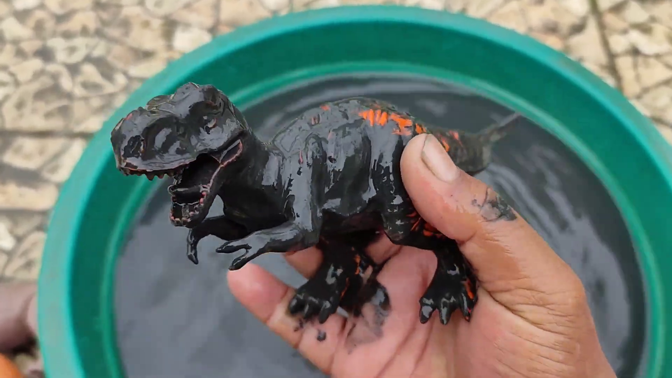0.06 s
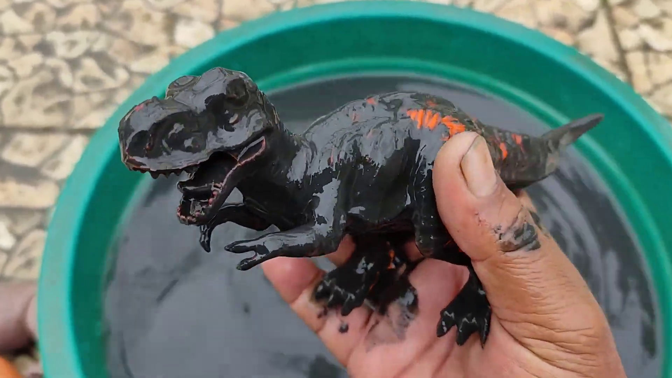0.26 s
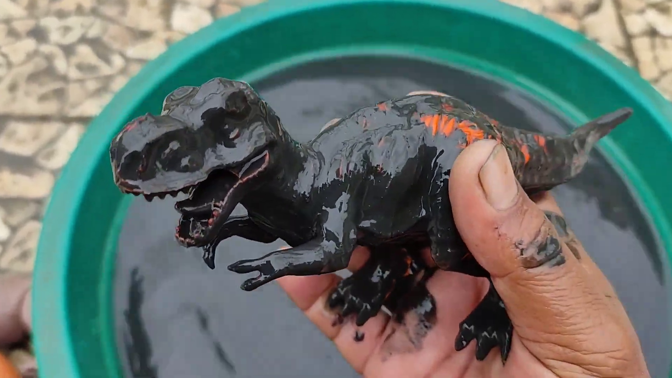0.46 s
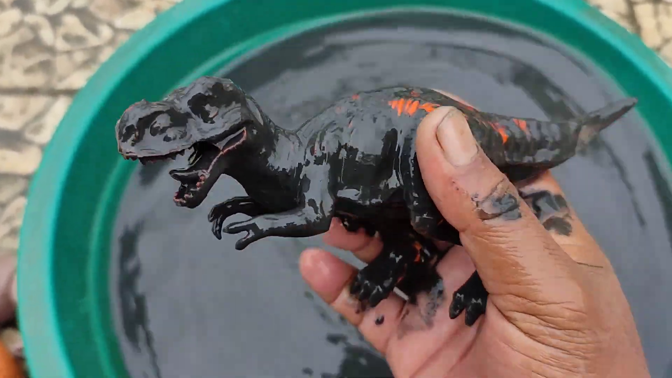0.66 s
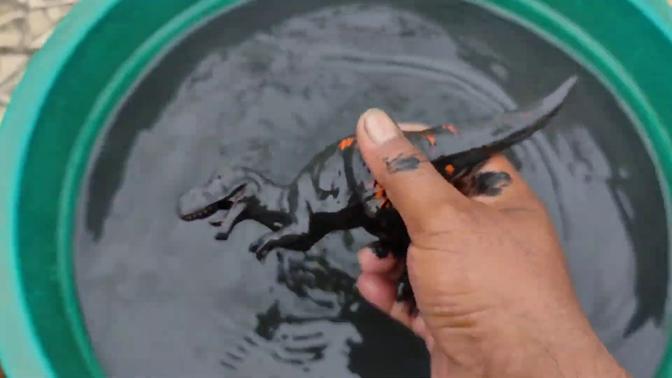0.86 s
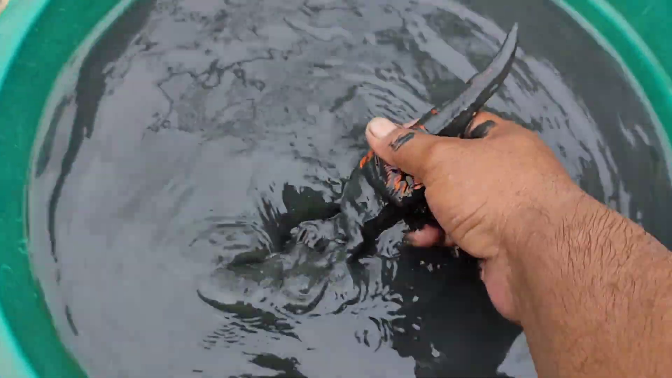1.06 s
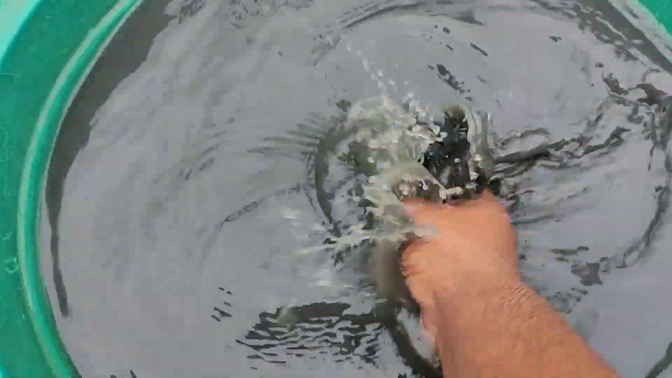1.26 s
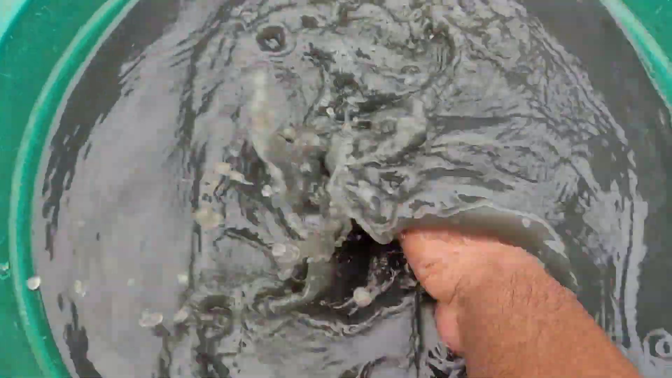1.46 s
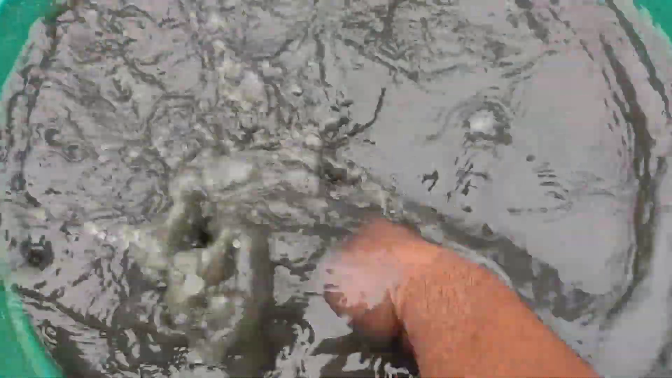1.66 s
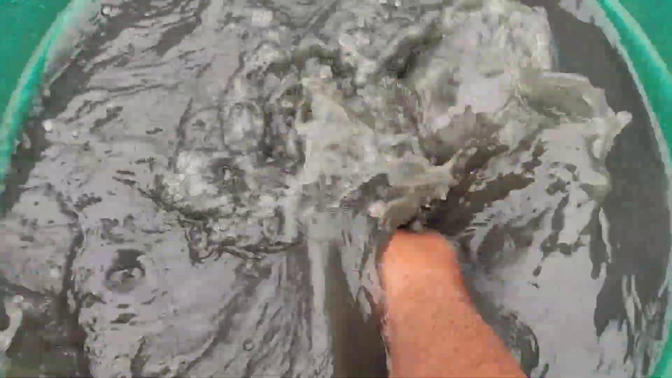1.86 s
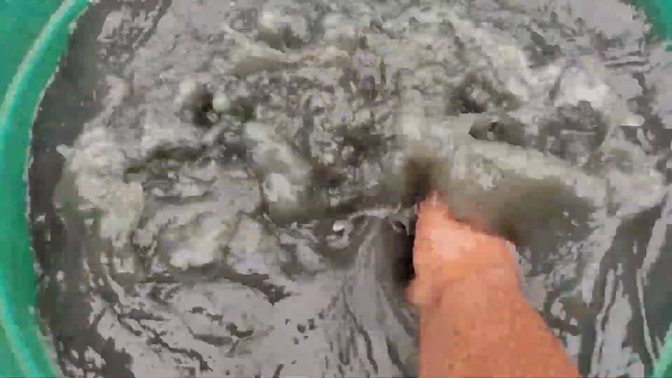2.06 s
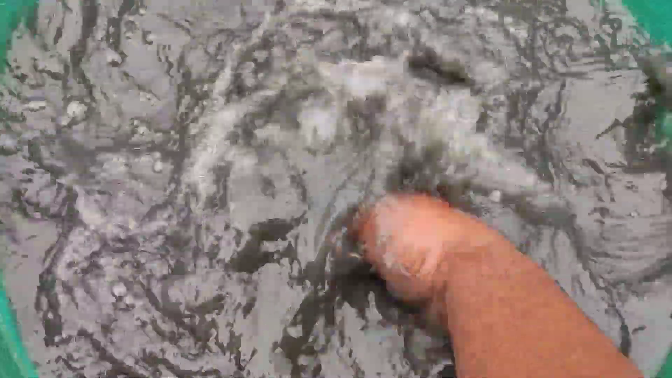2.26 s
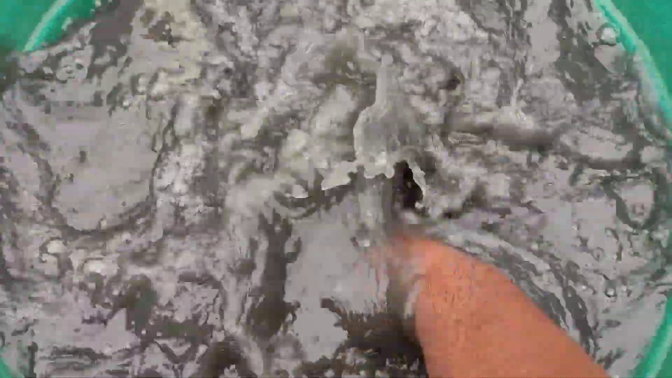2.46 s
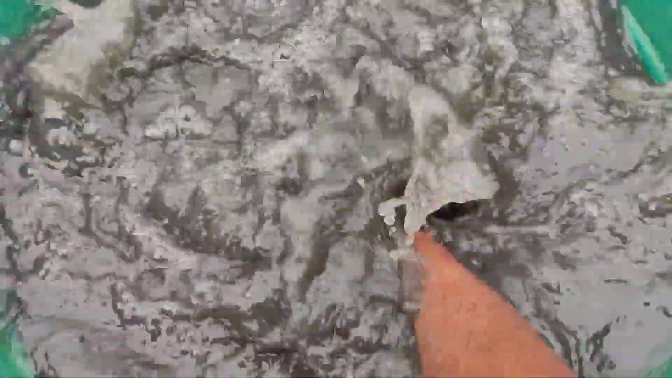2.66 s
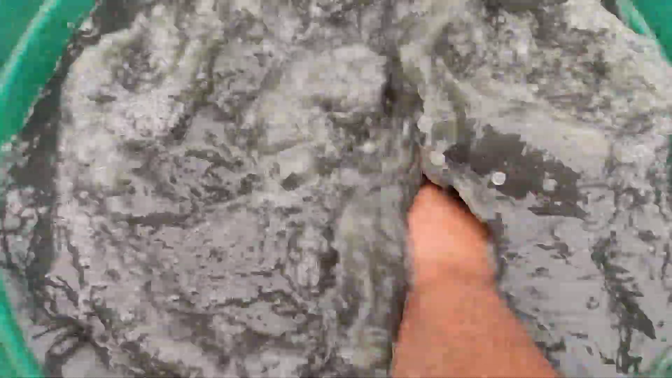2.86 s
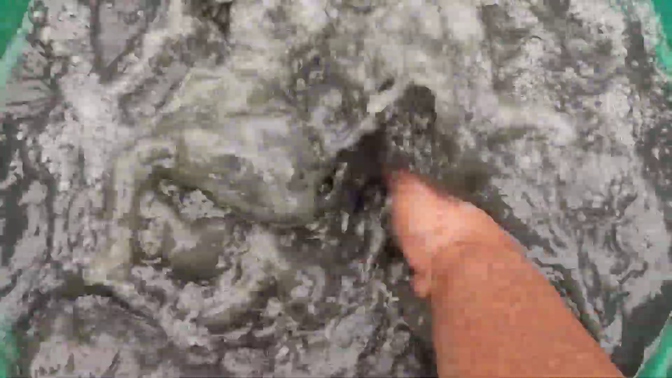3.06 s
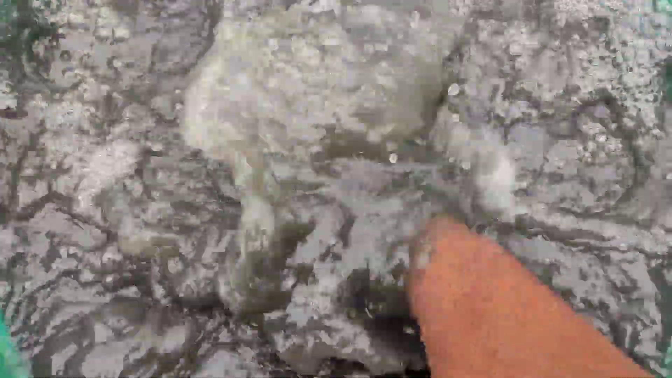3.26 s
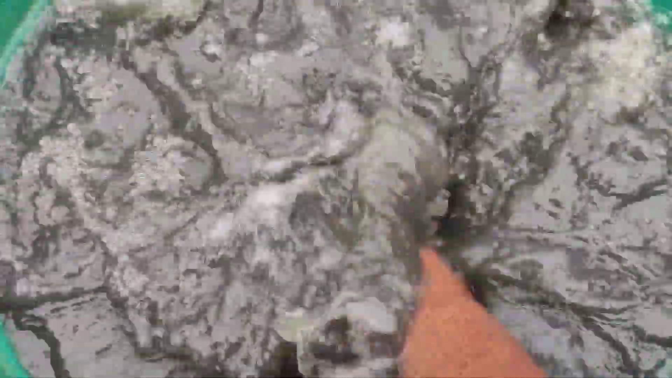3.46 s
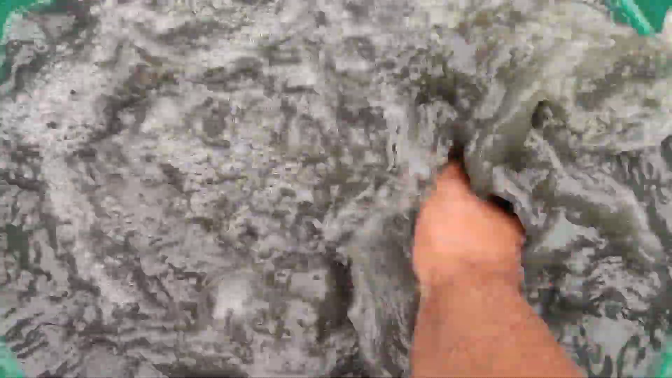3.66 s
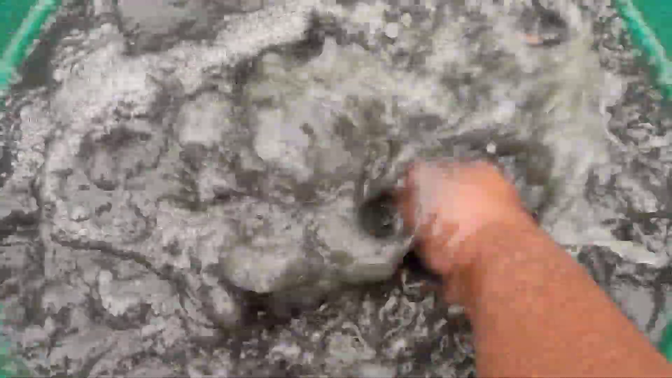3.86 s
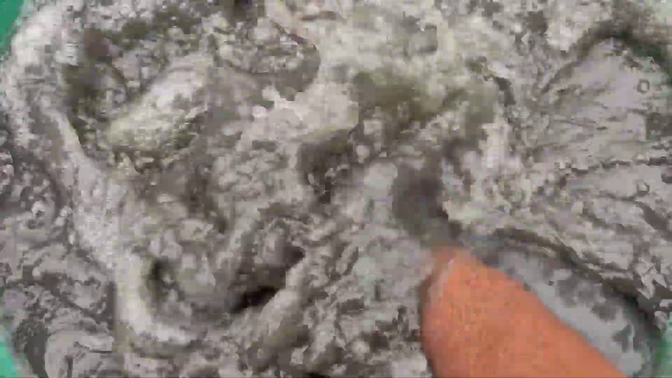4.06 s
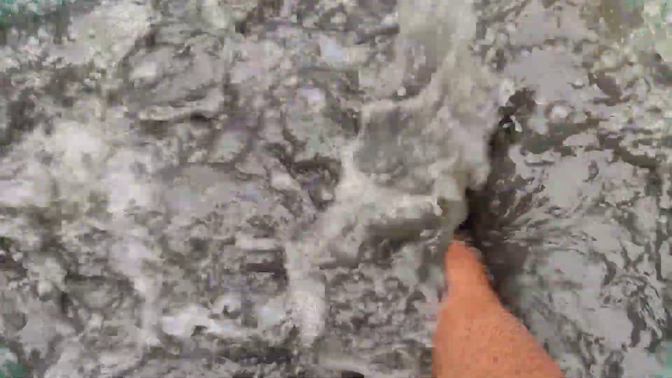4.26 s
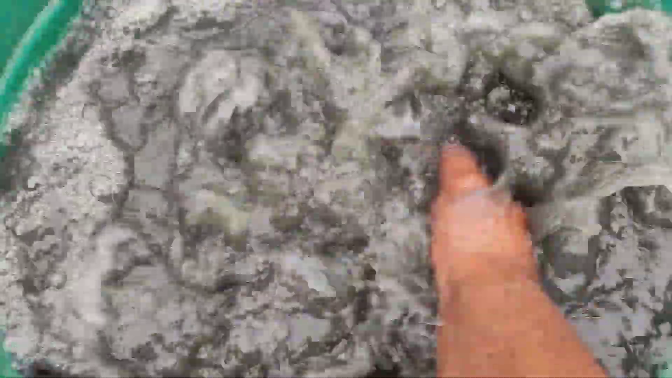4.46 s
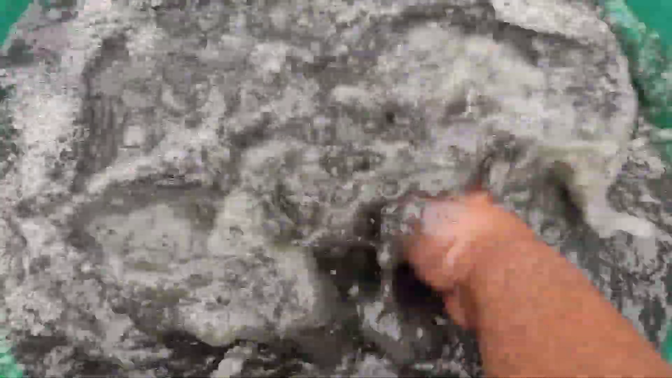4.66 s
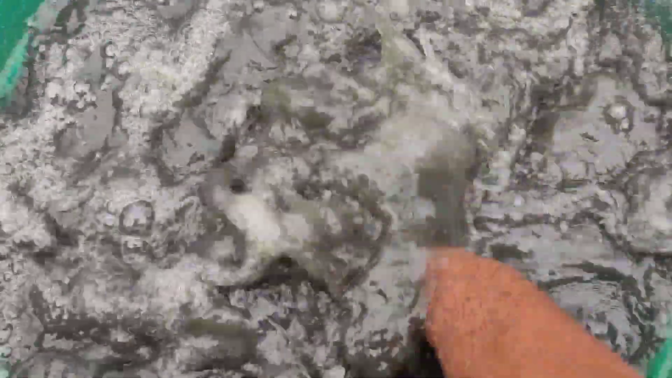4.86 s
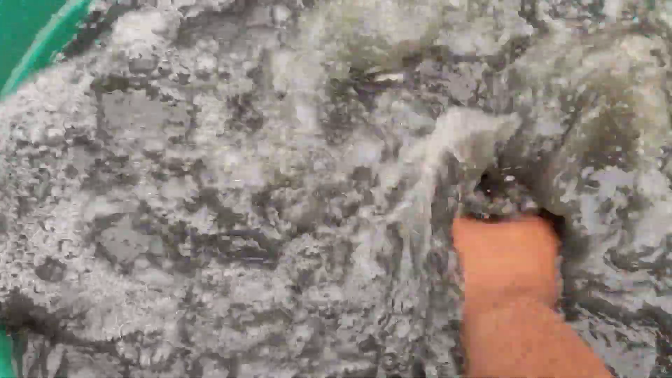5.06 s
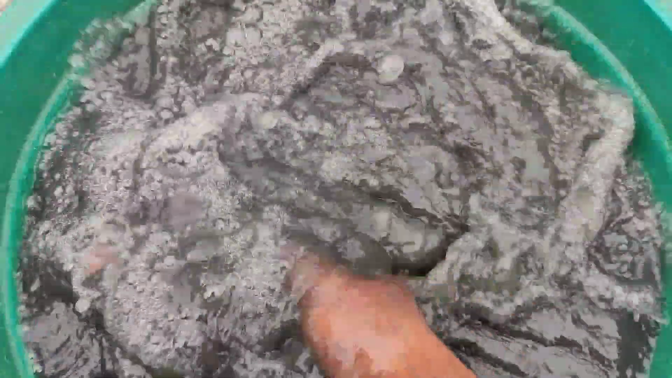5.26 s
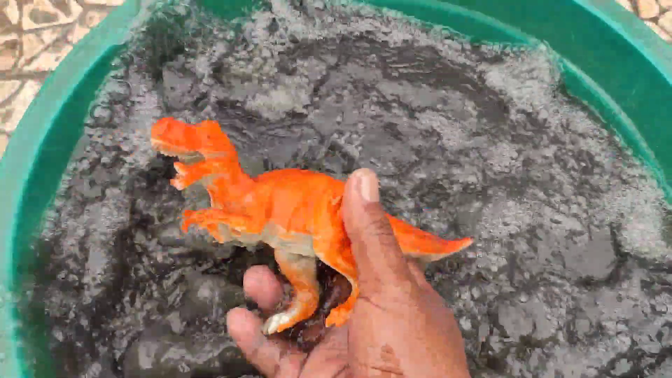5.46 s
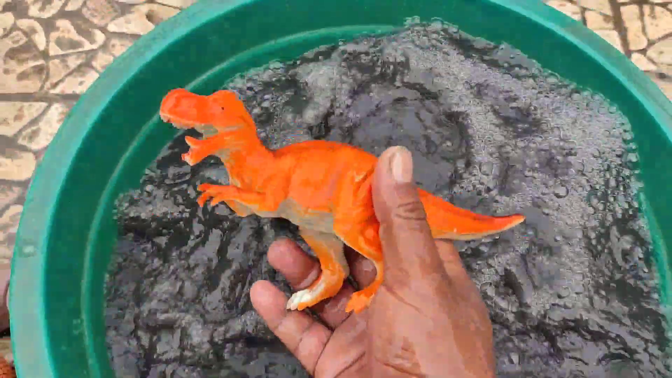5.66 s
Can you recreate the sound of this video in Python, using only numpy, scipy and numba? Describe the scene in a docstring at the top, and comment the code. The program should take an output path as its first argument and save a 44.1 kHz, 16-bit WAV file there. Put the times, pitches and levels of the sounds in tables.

```python
"""Swishing a toy in soapy water

A hand dips a plastic toy into a basin of soapy, muddy water, swishes it hard for four seconds and lifts it out.
Trapped air rings as rising sine tones, from deep gulps to fine spray; slaps are short, tuned noise bursts.
The wet toy's rubbing is uneven noise, and a low rumble and a faint hiss of filtered noise lie under it all."""
import sys
import numpy as np
from scipy import signal
from scipy.fft import rfft, irfft, next_fast_len
from scipy.io import wavfile
from scipy.ndimage import uniform_filter1d
from numba import njit

SR = 44100
rng = np.random.default_rng(int(sys.argv[2]) if len(sys.argv) > 2 else 0)


def transcribe(signal):
    """Save signal, clipped to [-1, 1], as a 16-bit WAV file at the path in sys.argv[1]."""
    frames = np.atleast_2d(signal).T
    limited = np.clip(frames, -1, 1)
    pcm = np.round(limited * 32767).astype(np.int16)
    wavfile.write(sys.argv[1], SR, pcm)


N = 252516
TIME = np.arange(N) / SR
LEFT_LAG_S = 0.00011  # the left side hears the water slightly later


def from_db(db):
    """Turn decibels into gain."""
    return 10 ** (np.asarray(db) / 20)


def rms_one(x):
    """Scale to an rms (average strength) of 1."""
    return x / np.sqrt(np.mean(x ** 2) + 1e-20)


def in_time(rows):
    """Turn each dB column of a time curve into a gain per sample."""
    s, *columns = np.transpose(rows)
    return [from_db(np.interp(TIME, s, column)) for column in columns]


def at_hz(points, hz):
    """Read the gain of a spectrum at these frequencies."""
    known_hz, db = np.transpose(points)
    return from_db(np.interp(np.log(np.maximum(hz, 1)), np.log(known_hz), db))


def colour(x, spectrum):
    """Filter by a spectrum that falls away steeply past both ends."""
    size = next_fast_len(x.shape[-1] + 2000)
    hz = np.fft.rfftfreq(size, 1 / SR) + 1
    lowest_hz, highest_hz = spectrum[0][0], spectrum[-1][0]
    skirts = np.minimum(1, np.minimum(hz / lowest_hz, highest_hz / hz)) ** 4
    return irfft(rfft(x, size) * at_hz(spectrum, hz) * skirts, size)[..., :x.shape[-1]]


def add(out, s, sound):
    """Mix a stereo sound in at time s."""
    i = int(np.clip(round(s * SR), 0, N - 1))
    out[:, i:i + sound.shape[-1]] += sound[:, :N - i]


def panned(left_db):
    """Give the gains of two channels that differ by this many dB."""
    return from_db(np.array([[.5], [-.5]]) * left_db)


def delayed(x, s):
    """Make one channel later by s."""
    return np.interp(TIME - s, TIME, x, left=0)


def evened(x, span_s):
    """Hold the running level near 1 and keep the faster grain."""
    size = max(int(span_s * SR), 8)
    power = uniform_filter1d(uniform_filter1d(np.mean(x ** 2, axis=0), size), size)
    floor = 0.11 * np.mean(power)  # keeps quiet gaps from being blown up
    return x / np.sqrt(np.maximum(power, 0) + floor)


def resonance(x, hz, q):
    """Ring like a damped resonance with gain 1 at its top."""
    hz = np.clip(hz, 100, .4 * SR)
    return signal.lfilter(*signal.iirpeak(hz, max(q, 1), fs=SR), x + 1e-18)


@njit
def ring_bubbles(rows, size, rate):
    """Each pocket of air rings as a fading sine and rises in pitch as it nears the surface."""
    # columns: start_s, pitch_hz, gain, t60_s (time to fade by 60 dB), rise, left_lag_s, left_gain
    out = np.zeros((2, size))
    for s, hz, gain, t60, rise, lag_s, left in rows:
        for channel in range(2):
            born = s + lag_s * (1 - channel)
            height = gain * (left if channel == 0 else 1 / left)
            for i in range(max(int(born * rate) + 1, 0), min(int((born + t60) * rate), size)):
                t = i / rate - born
                swell = (1 - np.exp(-1.5 * hz * t)) * np.exp(-np.log(1000) * t / t60)
                out[channel, i] += height * swell * np.sin(2 * np.pi * hz * t * (1 + .5 * rise * t / t60))
    return out


def bubble_cloud(sizes, count, cycles, rise, spread_db, scatter_s, pan_db, even_s):
    """Bubbles are born at random all over the basin and ring for some cycles; running level near 1."""
    when, size = rng.random((2, count))
    loud, life, climb, place, side = rng.normal(size=(5, count))
    lowest_hz, highest_hz = sizes[0][0], sizes[-1][0]
    hz = lowest_hz * (highest_hz / lowest_hz) ** size
    gain = at_hz(sizes, hz) * from_db(spread_db * loud)
    t60 = max(cycles, 2) / hz * 2 ** (.5 * life)
    lag_s = LEFT_LAG_S + scatter_s * place
    rows = [when * N / SR, hz, gain, t60, rise * (1 + climb), lag_s, from_db(.5 * pan_db * side)]
    return evened(ring_bubbles(np.column_stack(rows), N, SR), even_s)


def spatter(t60, tail_db, tail_t60, attack_s, direct_db):
    """An impact is a crack and a brief fizz, partly shared by both sides; energy 1 on each side."""
    t = np.arange(1600) / SR
    crack, fizz = from_db(-60 * t / t60), from_db(tail_db - 60 * t / tail_t60)
    shape = (crack + fizz) * (1 - np.exp(-t / attack_s))
    direct, *scattered = rng.standard_normal((3, len(t)))
    both_sides = np.array([np.roll(direct, round(LEFT_LAG_S * SR)), direct])
    burst = shape * (scattered + from_db(direct_db) * both_sides)
    return burst / np.sqrt(np.sum(burst ** 2, axis=1, keepdims=True))


# how much the two sides of the background differ, columns: pitch_hz, side_minus_middle_db
BACKGROUND_SIDE = [(60, -6), (120, -17), (240, -9.5), (480, -2), (950, 3.5), (1890, 1), (3770, 1),
                   (7520, -1), (15000, -2)]


def background(spectrum):
    """Steady noise differs between the sides by an amount that depends on pitch; rms 1."""
    mid, side = colour(rng.standard_normal((2, N)), spectrum)
    return rms_one(mid + colour(side, BACKGROUND_SIDE) * [[1], [-1]])


# colour of the rumble, columns: pitch_hz, relative_level_db
RUMBLE = [(15, -62), (25, -34), (48, -16), (135, 2), (241, -3), (320, -12.5), (368, -10.5), (410, -16),
          (484, -21.5), (854, -27.5), (1200, -38), (1560, -73), (2640, -120)]
# the rumble sinks while the water is loud, columns: time_s, change_db
RUMBLE_SWELL = [(0, 1.5), (.6, 1), (1.25, 2), (1.6, -9.5), (3, -8.5), (5.3, -6.5), (5.73, -4.5)]


def rumble():
    """Low noise follows a timed level curve."""
    swell, = in_time(RUMBLE_SWELL)
    return from_db(-40.5) * swell * background(RUMBLE)


# colour of the hiss, columns: pitch_hz, relative_level_db
HISS = [(410, -33), (700, -8), (1020, -6), (1180, -7), (1360, -2), (2490, -13), (3640, -10), (5690, -19),
        (6740, -11.5), (7690, -11), (9600, -1.5), (10400, -11), (15400, -27), (16000, -49)]


def hiss():
    """Faint noise stays at a steady level."""
    return from_db(-53) * background(HISS)


# colour of the rubbing toy, columns: pitch_hz, relative_level_db
SWISH = [(500, 2), (850, 8), (1500, 1.5), (3000, 3.5), (6000, -5.5), (9000, -4.5), (12000, -1.5),
         (16000, -29)]
# moment of the slip; level there before the rub or scuff offset; speed of rise and fall
SWISH_SLIP_S, SWISH_DB, SWISH_RISE_DB_PER_S, SWISH_FALL_DB_PER_S = .682, -40, 67, 62
# offset while rubbing; depth and length of the uneven grain
SWISH_RUB_DB, SWISH_ROUGH_DB, SWISH_GRAIN_S = -7, 1, 0.0062
SCUFF_DB, SCUFF_S = 5.5, 0.017  # the slip itself: height over the swish, time constant


def swish():
    """Wet plastic rubs ever louder and unevenly over the fingers, slips with a scuff and dies away."""
    t = TIME - SWISH_SLIP_S
    rubbing_db = SWISH_RUB_DB + SWISH_RISE_DB_PER_S * t
    slipping_db = SCUFF_DB * np.exp(-abs(t) / SCUFF_S) - SWISH_FALL_DB_PER_S * t
    level_db = SWISH_DB + np.where(t < 0, rubbing_db, slipping_db)
    grain = rms_one(uniform_filter1d(rng.standard_normal(N), max(int(SWISH_GRAIN_S * SR), 2)))
    rough_noise = from_db(SWISH_ROUGH_DB * grain) * rng.standard_normal((2, N))
    return from_db(level_db) * rms_one(colour(rough_noise, SWISH))


# the loudest air pockets, columns: start_s, pitch_hz, relative_level_db, t60_s (time to fade by 60 dB),
# rise (share by which the pitch climbs while it rings)
BUBBLES = [(.555, 675, -42, 0.12, .1), (1.108, 1250, -31, 0.028, 0.33), (1.116, 2950, -27, 0.025, .2),
           (1.1402, 1265, -9, 0.011, .2), (1.164, 1340, -33.5, 0.043, .4), (1.249, 816, -24.5, .035, 0.33),
           (1.263, 1210, -26.5, .025, 0.43), (1.279, 840, -29, .03, 0.19), (1.309, 1500, -22, .025, 0.37),
           (1.3277, 4460, -9, 0.011, 0.11), (1.3858, 694, -13, 0.075, 0.07),
           (1.402, 710, -13.5, 0.038, 0.75), (1.416, 3190, -23, .014, .1), (1.427, 1440, -25, 0.064, .6),
           (1.4316, 2690, -16.5, .016, .1), (1.4386, 469, -13.5, 0.11, 0.068), (1.46, 1760, -17, .012, .2),
           (1.4606, 675, -9.5, 0.11, 0.22), (1.467, 1240, -10, 0.014, 0.18), (1.4724, 1480, -14, 0.018, .2),
           (1.474, 2720, -18, 0.013, .2), (1.481, 2320, -21, 0.012, .2), (1.483, 1130, -21, 0.023, .2),
           (1.4982, 1175, -7, 0.034, 0.066), (1.503, 3120, -30, 0.017, .1), (1.508, 1500, -17, 0.021, .4),
           (1.531, 2030, -18, 0.013, .3), (1.578, 1220, -21.5, 0.022, .2), (1.612, 1560, -22.5, 0.04, 0.22),
           (1.623, 404, -18.5, 0.092, 0.53), (1.629, 1480, -20, .02, 0.18),
           (1.636, 2050, -19.5, 0.023, 0.18), (1.6376, 1330, -14, 0.042, 0.21),
           (1.66, 992, -11.5, 0.035, 0.22), (1.663, 530, -17.5, 0.023, 0.18),
           (1.6655, 983, -12.5, 0.023, 0.17), (1.683, 900, -30, .025, .2), (1.701, 1060, -23, .025, .2),
           (1.719, 430, -22, 0.043, 0.36), (1.731, 2400, -25, .02, 0.48), (1.7778, 1440, -20, 0.015, .1),
           (1.8632, 1094, -17.5, 0.054, 0.37), (1.88, 2010, -24, .018, .2), (1.889, 1170, -15, 0.027, 0.14),
           (1.915, 390, -12.5, 0.026, .2), (1.922, 646, -20, 0.046, 0.27), (1.9379, 430, -12, 0.041, 0.43),
           (1.9424, 1144, -10.5, 0.022, .3), (1.944, 1520, -5, 0.0098, 0.21),
           (1.948, 1860, -8.5, 0.0098, 0.17), (1.956, 680, -23, 0.064, .4),
           (2.003, 885, -19.5, 0.046, 0.18), (2.027, 1630, -27.5, .025, 0.28),
           (2.036, 173, -19.5, 0.13, .2), (2.181, 415, -17, 0.036, .2), (2.198, 1660, -16, 0.029, .1),
           (2.208, 1060, -22, 0.043, .3), (2.231, 425, -2.5, 0.041, 0.14), (2.294, 346, 5.5, 0.0047, 0.17),
           (2.354, 385, -19, 0.17, 0.18), (2.3555, 1590, -20.5, 0.023, 0.077),
           (2.462, 750, -12, 0.02, 0.25), (2.4725, 514, -14, 0.056, 0.21), (2.479, 1565, -8, 0.026, .3),
           (2.5199, 395, 0.5, 0.019, 0.15), (2.5201, 770, -11, 0.0079, 0.15), (2.526, 1660, -21, 0.029, .1),
           (2.56, 178, -20.5, 0.16, 0.3), (2.669, 1370, -20, 0.041, 0.95), (2.7024, 358, -8.5, 0.034, 0.37),
           (2.7218, 3900, -19, .012, .2), (2.7515, 417, -6.5, 0.013, .2), (2.8412, 420, -1, .01, 0.17),
           (2.842, 925, -15, 0.03, 0.28), (3.091, 187, -17.5, 0.072, .2), (3.134, 361, -20.5, 0.13, .2),
           (3.1788, 1174, -9.5, 0.026, 0.23), (3.29, 2900, -21, 0.023, .2), (3.366, 175, -8, 0.033, 0.17),
           (3.367, 785, -14, 0.024, 0.27), (3.4098, 910, -7.5, 0.014, 0.23),
           (3.463, 1190, -18.5, 0.023, .3), (3.577, 870, -18, 0.024, 0.2), (3.586, 2200, -15, 0.016, .2),
           (3.636, 463, -16.5, 0.05, 0.14), (3.638, 153.7, -22.5, 0.3, 0.22),
           (3.6408, 895, -5, 0.0086, 0.25), (3.6848, 503, -13.5, 0.024, 0.23),
           (3.726, 3580, -12.5, 0.022, 0.1), (3.7258, 305, -15, 0.03, .2), (3.7455, 1130, -13.5, 0.017, .2),
           (3.792, 420, -15, .025, .2), (3.812, 1030, -18, 0.033, 0.24), (3.815, 473, -10.5, 0.037, 0.23),
           (3.9119, 800, 3.5, 0.0069, 0.15), (3.9207, 208, -10, 0.098, 0.15),
           (3.953, 365, -10.5, 0.028, 0.48), (4.0033, 814, -15.5, 0.062, 0.24),
           (4.1363, 426, -19, 0.11, 0.24), (4.139, 1480, -16.5, 0.024, 0.24),
           (4.229, 260, -11.5, 0.059, 0.18), (4.2329, 370, -12, 0.15, 0.33), (4.236, 850, -23, 0.04, .3),
           (4.254, 1230, -21, 0.027, .3), (4.277, 1090, -22, 0.014, 0.33), (4.345, 960, -12.5, 0.027, 0.36),
           (4.354, 428, -5.5, 0.026, 0.16), (4.376, 365, -14.5, 0.046, 0.41),
           (4.381, 3190, -8, 0.028, 0.11), (4.4345, 1620, -14.5, 0.017, .1),
           (4.453, 3640, -5.5, 0.013, 0.29), (4.4528, 423, -5.5, 0.014, 0.22),
           (4.4555, 1025, -11, 0.023, 0.21), (4.457, 140, 3, 0.024, .2), (4.465, 184, -3.5, 0.095, 0.29),
           (4.509, 715, -13, 0.017, 0.42), (4.563, 1060, -20, 0.041, 0.38),
           (4.61, 1100, -12.5, 0.018, 0.25), (4.653, 393, -16.5, 0.087, 0.31), (4.668, 945, -19, 0.03, .3),
           (4.7187, 398, -7, 0.036, 0.22), (4.7232, 199, -0.5, 0.028, 0.16),
           (4.7285, 732, -4.5, 0.034, 0.16), (4.7684, 333, 2.5, 0.0093, 0.25),
           (4.828, 675, -18.5, 0.052, 0.23), (4.832, 1380, -12.5, 0.017, 0.2),
           (4.841, 1720, -16, 0.024, .2), (4.871, 2930, -17.5, .025, .1), (4.895, 550, -11, 0.02, .2),
           (4.9831, 680, 2, 0.0096, 0.22), (4.9868, 456, 5, 0.0018, 0.18), (4.993, 218, 2, 0.017, 0.2),
           (5.0332, 740, -7.5, 0.035, 0.24), (5.0445, 2250, -16, 0.011, .1), (5.114, 372, -10, 0.04, 0.23),
           (5.125, 1060, -15, 0.035, 0.34), (5.157, 1060, -18, 0.027, 0.22),
           (5.16, 410, -10.5, 0.033, 0.26), (5.196, 800, -4, .0093, 0.22), (5.213, 510, -16, 0.033, 0.18),
           (5.2196, 870, -4, 0.008, 0.22), (5.292, 403, -26, 0.029, .2), (5.344, 1550, -33, 0.032, 0.34),
           (5.367, 1405, -27.5, 0.038, 0.51), (5.398, 517, -29, .04, .4), (5.44, 1490, -33, .025, .3),
           (5.482, 1420, -28, 0.043, .3), (5.4859, 1940, -22, 0.022, 0.32), (5.5077, 650, -12.5, 0.013, .2),
           (5.509, 2040, -21, 0.013, 0.61), (5.566, 1330, -23.5, 0.051, 0.76),
           (5.57, 1020, -25, 0.071, 0.22), (5.6014, 800, -24, 0.041, 0.53), (5.617, 1110, -27, 0.028, 0.58),
           (5.653, 900, -17, 0.022, 0.16)]
# small bubbles that split off: top level against their plop, latest start, how far above it they ring
SHED_DB, SHED_WITHIN_S, SHED_OCTAVES = -17, .026, 1.5


def plops(count=3):
    """Single bubbles stand out of the churning, chirp upward and each shed a few smaller ones."""
    rows = []
    for s, hz, db, t60, rise in BUBBLES:
        rows.append((s, hz, from_db(db), max(t60, .004), rise, LEFT_LAG_S, 1))
        for late, small, place, side in rng.random((count, 4)):
            shed_s = s + SHED_WITHIN_S * late
            shed_hz = hz * 2 ** (SHED_OCTAVES * small)
            shed_t60 = min(20 / shed_hz, .04)
            # a short plop sheds weaker bubbles
            gain = from_db(db + SHED_DB) * np.sqrt(min(abs(t60) / shed_t60, 1))
            rows.append((shed_s, shed_hz, gain, shed_t60, rise, 2 * place * LEFT_LAG_S, 2 ** (side - .5)))
    return ring_bubbles(np.array(rows, float), N, SR)


SETTLE_S, SETTLE_SHARE = 0.61, 0.082  # water falling back: time constant, share of the power


def settling(gain):
    """Thrown water keeps falling back for a moment after each stroke."""
    r = np.exp(-1 / (SETTLE_S * SR))
    falling_power = signal.lfilter([1 - r], [1, -r], gain ** 2)
    return np.sqrt(gain ** 2 + abs(SETTLE_SHARE) * falling_power)


# strokes of the hand through the water, columns: start_s, length_s, gurgle_db, spray_db (both relative)
STROKES = [(1.08, 0.089, -65, -49.5), (1.321, 0.0081, -31, -24), (1.413, 0.1, -31, -34.5),
           (1.6, 0.095, -34.5, -38.5), (1.839, 0.1, -34.5, -37), (2.134, 0.062, -57, -36.5),
           (2.186, 0.065, -31, -36.5), (2.258, 0.088, -51, -37.5), (2.427, 0.1, -33.5, -40),
           (2.676, 0.044, -50, -38), (2.833, 0.036, -43, -44), (2.939, 0.098, -34.5, -34.5),
           (3.117, 0.067, -35, -39), (3.213, 0.064, -31.5, -36.5), (3.451, 0.036, -38, -37),
           (3.534, .059, -32, -34.5), (3.716, 0.027, -28.5, -35), (3.783, 0.012, -43, -31.5),
           (3.785, 0.086, -38, -36.5), (4.006, 0.051, -28, -47), (4.041, 0.086, -35.5, -30),
           (4.21, 0.084, -25.5, -36), (4.299, 0.1, -27.5, -28), (4.543, 0.11, -33, -31.5),
           (4.821, .11, -33, -31.5), (5.024, 0.05, -31.5, -41), (5.131, 0.043, -27, -29.5),
           (5.19, 0.027, -32, -36), (5.464, 0.059, -38.5, -41.5), (5.605, 0.12, -62, -40.5)]
STROKE_RELEASE_S = 0.0088  # time constant
# share of a stroke that each takes to swell: air is dragged under first, then water flies
GURGLE_BUILD, SPRAY_BUILD = 0.22, 0.27


def strokes():
    """Each stroke swells the gurgle and spray, holds while the hand pushes, and lets go."""
    gurgle_gain, spray_gain = np.zeros((2, N))
    for start, length, gurgle_db, spray_db in STROKES:
        progress = (TIME - start) / length
        release = np.exp(-np.maximum(TIME - start - length, 0) / STROKE_RELEASE_S)
        gurgle_gain += from_db(gurgle_db) * np.clip(progress / GURGLE_BUILD, 0, 1) * release
        spray_gain += from_db(spray_db) * np.clip(progress / SPRAY_BUILD, 0, 1) * release
    return settling(gurgle_gain), settling(spray_gain)


# brief dips and swells in the level of gurgle and spray, columns: middle_s, half_length_s,
# gurgle_change_db, spray_change_db
DIPS_AND_SWELLS = [(1.29, .015, -1, -7), (1.574, 0.018, -1, 6.5), (1.758, 0.029, 1.5, -4),
                   (2.032, 0.049, -7.5, -3), (2.643, 0.036, -1, -5), (2.787, 0.015, 0, 1.5),
                   (3.207, 0.011, 0, -17), (3.38, 0.012, 2, -5.5), (3.696, 0.018, 3, -15),
                   (4.178, 0.016, -3, -3.5), (4.404, 0.0092, -11, -9), (4.483, 0.02, 4.5, -3.5),
                   (4.717, 0.025, -6, 4), (4.976, 0.014, -12, -0.5), (5.26, 0.015, -5, 2)]


def dips_and_swells():
    """The levels of gurgle and spray each dip or swell smoothly for a moment."""
    change_db = np.zeros((2, N))
    for s, half, *changes_db in DIPS_AND_SWELLS:
        change_db += np.outer(changes_db, np.exp(-((TIME - s) / half) ** 2))
    return from_db(change_db)


# how hard the water heaves between strokes, columns: time_s, relative_level_db
AGITATION = [(.98, -100), (1.03, -59), (1.1, -51.5), (1.3, -50), (1.5, -49), (1.8, -42), (2.1, -34.5),
             (2.65, -37), (3.2, -34), (3.5, -39), (3.68, -35.5), (3.95, -31), (4.42, -36.5), (4.55, -31.5),
             (4.95, -35), (5.2, -31), (5.3, -43.5), (5.72, -53.5)]
FULL_SWING_DB = -36.5  # agitation from which a stroke's gulps have their full level
# spray gain of the heaving water at full swing; its dB per dB of agitation
FOAM_DB, FOAM_FOLLOWS = -40.5, 0.66
# gulp gain at full swing; its dB per dB of agitation; its part in a stroke
GULP_DB, GULP_FOLLOWS, GULP_STROKE_DB = -35.5, 1.19, -3


def stirring():
    """Heaving water and strokes set the gains of gulps, gurgle and spray; the last two briefly dip or swell."""
    heave, = in_time(AGITATION)
    swing = heave / from_db(FULL_SWING_DB)
    pushed, thrown = strokes()
    gurgle_change, spray_change = dips_and_swells()
    stroke_gulp = from_db(GULP_STROKE_DB) * pushed * np.minimum(swing, 1)
    gulp_gain = np.hypot(from_db(GULP_DB) * swing ** GULP_FOLLOWS, stroke_gulp)
    gurgle_gain = gurgle_change * np.hypot(heave, pushed)
    spray_gain = spray_change * np.hypot(from_db(FOAM_DB) * swing ** FOAM_FOLLOWS, thrown)
    return gulp_gain, gurgle_gain, spray_gain


# loudness of the deep bubbles, columns: pitch_hz, relative_level_db
GULP_SIZES = [(130, -16.5), (180, -4), (260, -9), (400, 6.5), (600, -2.5)]


def gulps():
    """Big pockets of air ring low and glide upward."""
    return bubble_cloud(GULP_SIZES, count=900, cycles=20.5, rise=0.268, spread_db=4.5,
                        scatter_s=.00008, pan_db=-1.0, even_s=0.025)


# loudness of the middle-sized bubbles, columns: pitch_hz, relative_level_db
GURGLE_SIZES = [(550, -1), (780, 7.5), (1100, 4.5), (1400, 0.5), (1650, 5), (2000, -9.5), (3200, -6)]


def gurgle():
    """Many middle-sized bubbles ring over each other."""
    return bubble_cloud(GURGLE_SIZES, count=4000, cycles=28, rise=.27, spread_db=3.7,
                        scatter_s=.00012, pan_db=3, even_s=.04)


# loudness of the tiny bubbles in the spray, columns: pitch_hz, relative_level_db
FIZZ_SIZES = [(2000, 0), (3500, 1), (7000, 3), (14000, 13)]
# colour of the spray, columns: pitch_hz, relative_level_db
SPRAY = [(900, 17), (2200, 6), (3200, 1), (4600, 1), (6300, -3), (7200, -5), (8800, 0.5), (10300, -3.5),
         (11800, 3), (13000, -12), (15000, -1.5), (16500, -21)]


def spray(fizz_db, even_s):
    """Droplets crackle and tiny bubbles ring over a faint mist of bursting foam; running level near 1."""
    fizz = bubble_cloud(FIZZ_SIZES, count=3200, cycles=42, rise=.06, spread_db=4.5,
                        scatter_s=.00016, pan_db=5, even_s=.06)
    mist = from_db(-11) * rng.standard_normal((2, N))
    out = crackle(per_s=1300, spread_db=2.0, q=5.8, pan_db=3) + from_db(fizz_db) * fizz + mist
    return evened(colour(out, SPRAY), even_s)


def crackle(per_s, spread_db, q, pan_db, count=9):
    """Droplets land at random and each spot they hit colours them in its own way; rms 1."""
    landings = rng.random(N) < per_s / SR
    heights = from_db(spread_db * np.minimum(rng.exponential(1, N), 5))
    drops = landings * heights * rng.choice([-1, 1], N)
    spot, out = rng.integers(0, count, N), 0
    for k, hz in enumerate(np.geomspace(2200, 13000, count)):
        burst = spatter(t60=.007, tail_db=-8, tail_t60=.03, attack_s=.0006, direct_db=-12)
        splat = resonance(burst, hz, q)
        heard = signal.oaconvolve([drops * (spot == k)], splat, axes=1)[:, :N]
        out = out + panned(pan_db * (k % 3 - 1)) * heard
    return rms_one(out)


# borders between the bands of droplet size, one column: pitch_hz
PATCH_EDGES_HZ = [2000, 3200, 4800, 7200, 9200, 11000, 12400]


def patchy(x, patch_db, patch_s):
    """Droplets of like size land in bunches, so each band above the first border swells on its own."""
    size = max(int(patch_s * SR), 8)
    below = [signal.sosfiltfilt(signal.butter(3, hz, fs=SR, output="sos"), x) for hz in PATCH_EDGES_HZ]
    below.append(x)
    out = below[0]
    for low, high in zip(below, below[1:]):
        bunches = rms_one(uniform_filter1d(uniform_filter1d(rng.standard_normal(N), size), size))
        out = out + (high - low) * rms_one(from_db(patch_db * np.minimum(bunches, 2)))
    return out


# loudness of the falling drops, columns: pitch_hz, relative_level_db
PLINK_SIZES = [(750, -2.5), (1400, 2.5), (2300, -2), (3400, -2), (4500, 0), (6500, -17)]


def plinks(level_db):
    """Drops fall back in a tangle, each trapping a small bubble that soon fades."""
    drops = bubble_cloud(PLINK_SIZES, count=1800, cycles=30, rise=.06, spread_db=3.5,
                         scatter_s=.00021, pan_db=6, even_s=.05)
    return from_db(level_db) * drops


# the sharpest slaps on the water, columns: start_s, relative_level_db, left_minus_right_db,
# pitch_hz (strongest)
SLAPS = [(1.0724, -35, 8, 9900.0), (1.0912, -18.0, 2, 10600), (1.139, -25.0, 1, 7400.0),
         (1.2038, -39.5, 12, 11200.0), (1.245, -36.5, -10, 3500.0), (1.2621, -26.5, -2, 8140),
         (1.2724, -33.0, 3, 3000.0), (1.3151, -18.0, 5, 12300), (1.3281, -12.5, 3, 12200.0),
         (1.385, -25, 2, 12200.0), (1.4591, -22, -1, 3100.0), (1.488, -30, -1, 7700.0),
         (1.498, -17, -4, 3100.0), (1.5068, -15.5, -2, 9000), (1.5306, -31, -1, 2700.0),
         (1.5989, -30, 1, 4700.0), (1.6605, -22, 9, 3170), (1.6856, -26.5, 4, 12200.0),
         (1.7788, -23.5, 9.5, 3800.0), (1.805, -35.5, 8, 10300.0), (1.9155, -11.5, -2, 11800),
         (2.0702, -27.5, 1, 4000.0), (2.0837, -40, -8, 8000.0), (2.145, -32, 11, 12200.0),
         (2.1834, -21, -2, 7400.0), (2.3085, -25.5, -6, 3500.0), (2.4494, -16, -1, 3870),
         (2.4629, -21, 6, 6500.0), (2.6796, -31.0, -4, 9500.0), (2.6907, -26.5, 5, 12200.0),
         (2.7214, -13.5, 2, 5700), (2.7466, -21, -2, 11200.0), (2.813, -21, -3, 9600),
         (2.8267, -22.5, -10, 6760), (3.1778, -19, -2, 6300.0), (3.1846, -22, 11, 6500.0),
         (3.211, -21.5, 3, 8400.0), (3.2248, -29.5, 9, 3000.0), (3.244, -21.0, -2, 9500.0),
         (3.25, -28, 2, 8400.0), (3.3466, -21.5, -1, 8700.0), (3.416, -27.5, -7, 4300.0),
         (3.4557, -19.5, -1, 11200.0), (3.5838, -25, 5, 2600.0), (3.6305, -15.5, -5.5, 3670),
         (3.7262, -19, 5, 3500.0), (3.7454, -23, -6, 3100.0), (3.783, -23, 0, 8700.0),
         (3.8202, -28, -5, 8050), (3.8727, -22, 1, 12200.0), (3.9164, -24.5, -7, 8700.0),
         (3.9865, -26.5, -7, 8900), (4.0189, -22.5, 2, 12200.0), (4.075, -21, -3, 4500.0),
         (4.117, -20.5, -8, 3100.0), (4.3195, -26, -4, 4100.0), (4.341, -18, -4, 8000.0),
         (4.38, -13, 0, 3220), (4.454, -18.5, -1, 3600.0), (4.4974, -21, -4, 12300),
         (4.5306, -31.5, 0, 12200.0), (4.5428, -22, 9, 11700.0), (4.5679, -12.5, -2, 2580),
         (4.61, -21, -2, 2800.0), (4.6327, -20.5, -7, 4000.0), (4.8945, -21.5, -9, 3800.0),
         (5.075, -30, 2, 7400.0), (5.0908, -25.0, 10, 3100.0), (5.1379, -20.5, 4, 7400.0),
         (5.1563, -13.5, 4, 3700), (5.1985, -20, -2, 7050), (5.3403, -27.5, 0, 7700.0),
         (5.353, -21, 0, 11700.0), (5.3898, -31, 7, 6500.0), (5.4683, -33, 5, 6800.0),
         (5.5572, -28.5, 1, 10400), (5.629, -25.5, 6, 6300.0), (5.65, -23, 6, 12200.0)]
# colour laid over all slaps, columns: pitch_hz, relative_level_db
SLAP = [(300, -21), (1400, 9), (3000, 3.5), (5000, 9.5), (7200, -0.5), (8800, 11), (10300, 3.5),
        (11800, 13), (14000, -12), (16500, -1.5)]
# fading time at the reference pitch; lower slaps ring longer by this power
SLAP_T60_S, SLAP_RING_LAW, SLAP_REFERENCE_HZ = 0.0082, 1, 8000


def slaps(level_db, q, wide_db):
    """Water hits the surface with a short tick; the pocket of air under each slap sets its pitch."""
    out = np.zeros((2, N))
    for s, db, left_db, hz in SLAPS:
        t60 = SLAP_T60_S * (SLAP_REFERENCE_HZ / hz) ** SLAP_RING_LAW
        burst = spatter(t60=t60, tail_db=-24, tail_t60=.03, attack_s=.0008, direct_db=2)
        burst = resonance(burst, hz, q) + from_db(wide_db) * burst
        burst = burst / np.sqrt(np.sum(burst ** 2))
        add(out, s, from_db(db + level_db) * panned(left_db) * burst)
    return colour(out, SLAP)


# colour of the churned foam, columns: pitch_hz, relative_level_db
WASH = [(300, -5), (450, 13), (800, 2), (1200, -2), (1700, 12.5), (2100, -27), (3200, 0), (5000, -22)]


def wash(rough_db, clump_s):
    """Torn foam is noise in short clumps: bubbles too dense to tell apart; rms 1."""
    foam, lumps = rng.standard_normal((2, N))
    clumps = rms_one(uniform_filter1d(lumps, max(int(clump_s * SR), 2)))
    sides = np.array([delayed(foam, LEFT_LAG_S), foam])
    return rms_one(colour(sides * from_db(rough_db * clumps), WASH))


# loudness of the dripping bubbles, columns: pitch_hz, relative_level_db
TRICKLE_SIZES = [(650, -12), (1000, 3), (1500, 15), (2000, -2), (2800, 10), (4500, 7), (8000, -4)]
TRICKLE_START_S, TRICKLE_ATTACK_S, TRICKLE_DB = 5.24, 0.13, -44


def trickle():
    """Water runs off the lifted hand and toy and drips into the basin as small, gliding bubbles."""
    running = np.clip((TIME - TRICKLE_START_S) / TRICKLE_ATTACK_S, 0, 1)
    drips = bubble_cloud(TRICKLE_SIZES, count=2000, cycles=38, rise=.3, spread_db=3.5,
                         scatter_s=.00015, pan_db=4, even_s=.08)
    return from_db(TRICKLE_DB) * running * drips


def deepest_cut(x, low_hz):
    """A small basin gives off little below its largest bubbles, so the deepest bass is filtered out."""
    return signal.sosfilt(signal.butter(3, low_hz, "high", fs=SR, output="sos"), x)


# echoes off the basin wall and floor, columns: left_delay_s, right_delay_s, level_db
ECHOES = [(.0029, 0.0027, -17), (.0052, .0061, -24.5)]


def surroundings(x, room_db, room_t60):
    """Quick echoes come from the basin and floor, with a weak diffuse tail of fading noise."""
    near = 0
    for left_s, right_s, db in ECHOES:
        near = near + from_db(db) * np.array([delayed(x[0], left_s), delayed(x[1], right_s)])
    t = TIME[:SR // 2]
    tail = rng.standard_normal((2, len(t))) * from_db(-60 * t / room_t60) * (t > .006)
    tail /= np.sqrt(np.sum(tail ** 2) / 2)
    return x + near + from_db(room_db) * signal.oaconvolve(x, tail, axes=1)[:, :N]


FOAM_START_S, FOAM_BUILD_S = 1.19, 0.55  # the water is whipped into foam: start, time until it is covered


def scene():
    """Stirring drives gulps, gurgle and spray; plops and slaps stand out of them, and a trickle follows."""
    gulp_gain, gurgle_gain, spray_gain = stirring()
    foamy = np.clip((TIME - FOAM_START_S) / FOAM_BUILD_S, 0, 1)
    churn = from_db(-1) * gurgle() + from_db(-5) * foamy * wash(rough_db=4.0, clump_s=0.0037)
    bubbling = gulp_gain * gulps() + gurgle_gain * churn + from_db(-0.5) * plops() + trickle()
    thrown = patchy(spray(fizz_db=-8.5, even_s=0.035), patch_db=3.5, patch_s=0.02)
    # plinks need both flying water and trapped air
    falling = np.sqrt(spray_gain * gurgle_gain) * plinks(level_db=-6.5)
    droplets = from_db(2.38) * spray_gain * thrown + falling
    water = deepest_cut(bubbling, low_hz=123) + droplets + slaps(level_db=14.5, q=4.0, wide_db=-11.0)
    wet = surroundings(water * panned(-1.1), room_db=-14.5, room_t60=0.058)
    return wet + swish() + rumble() + hiss()


# the two microphone ports colour the sound differently, columns: pitch_hz, left_minus_right_db
PORTS = [(20, 4), (190, 0), (350, -0.5), (750, 0.4), (2700, -0.1), (4200, 1), (6400, -7), (9800, -3),
         (14000, 14), (20000, -77)]


def record(dry):
    """Each port adds its colour, the highest peaks are rounded, and the top is cut."""
    heard = []
    for x, side in zip(dry, (.5, -.5)):
        heard.append(colour(x, [(hz, side * db) for hz, db in PORTS]))
    heard = np.array(heard)
    rounded = heard / (1 + (heard / .6) ** 4) ** .25
    return signal.sosfilt(signal.ellip(10, .1, 80, 15800, fs=SR, output="sos"), rounded)


dry = scene()
out = record(dry)
transcribe(out)
```